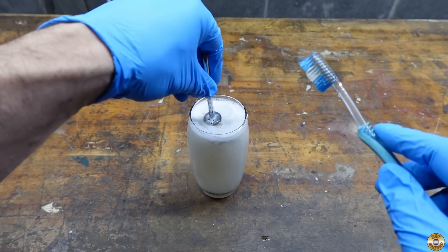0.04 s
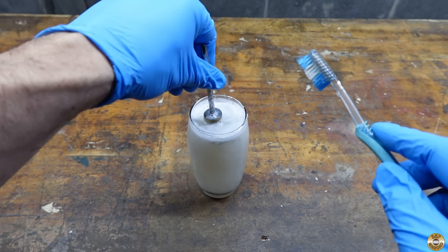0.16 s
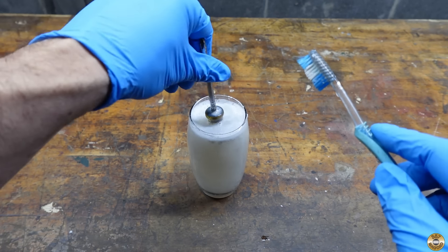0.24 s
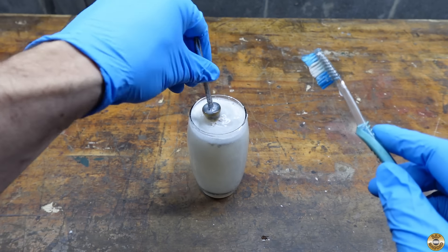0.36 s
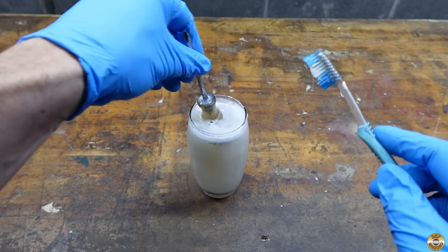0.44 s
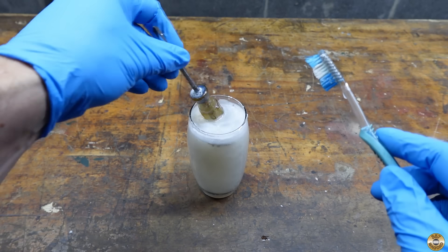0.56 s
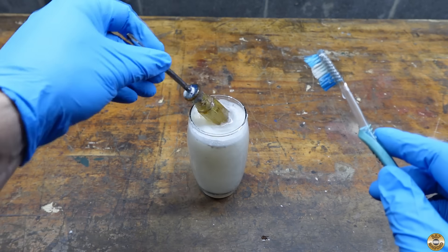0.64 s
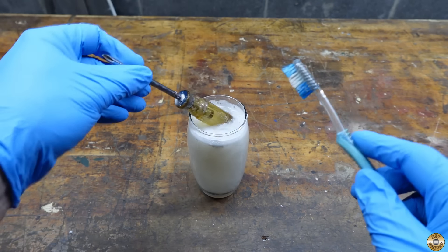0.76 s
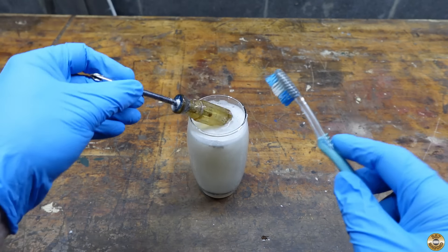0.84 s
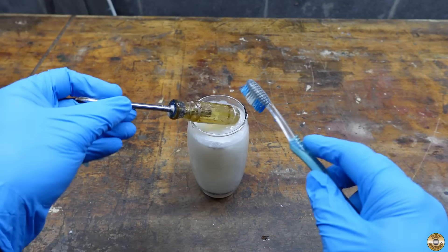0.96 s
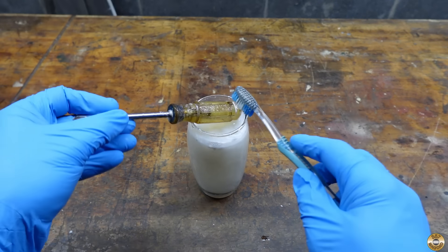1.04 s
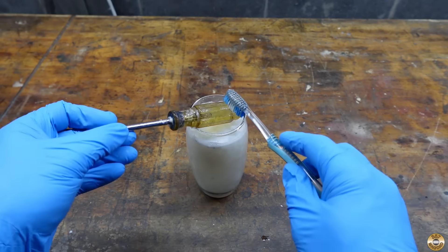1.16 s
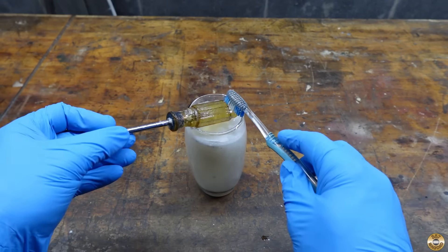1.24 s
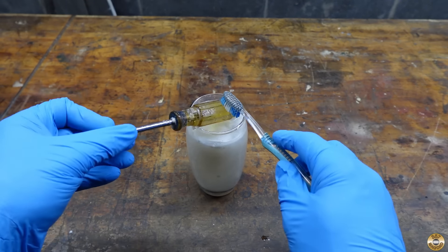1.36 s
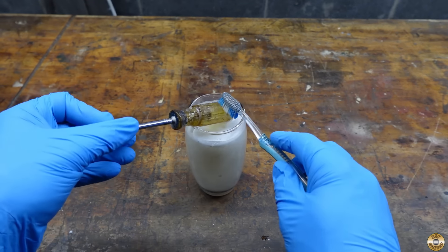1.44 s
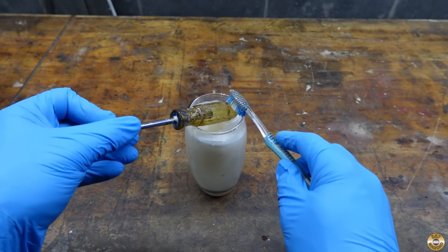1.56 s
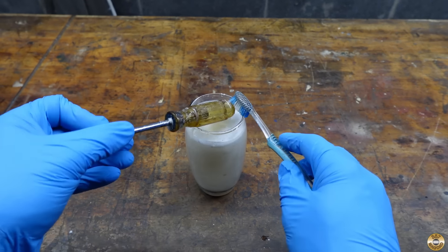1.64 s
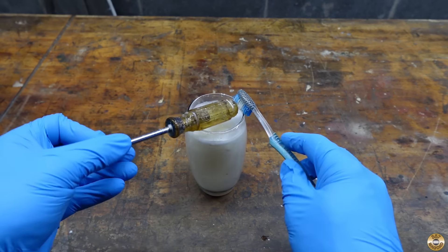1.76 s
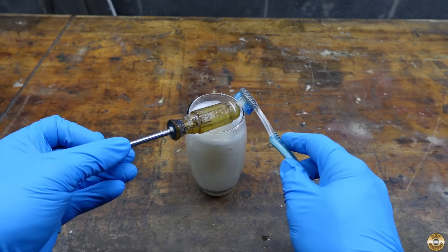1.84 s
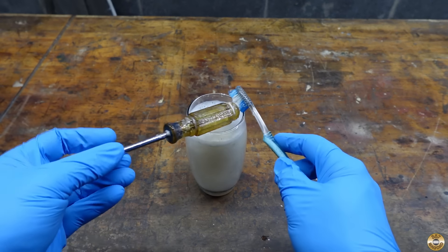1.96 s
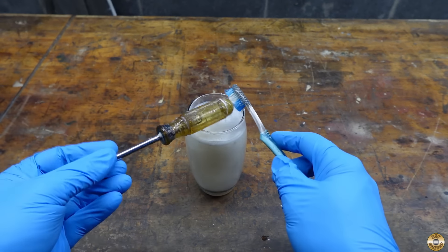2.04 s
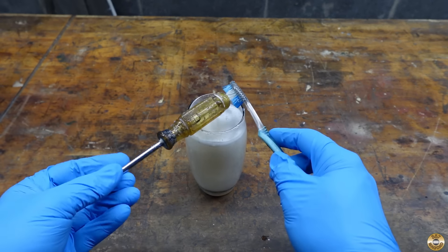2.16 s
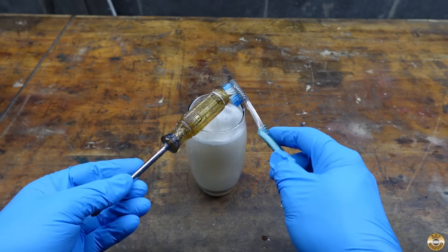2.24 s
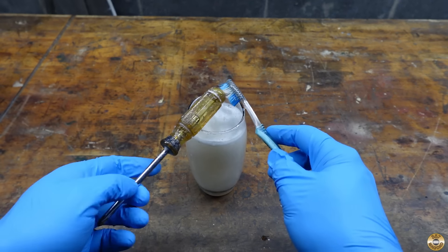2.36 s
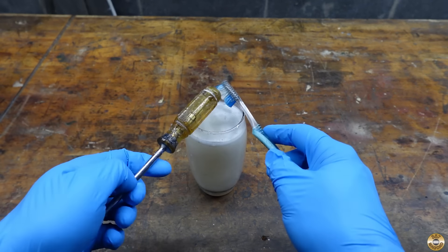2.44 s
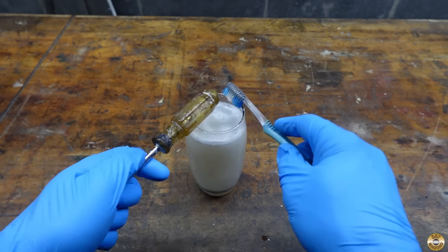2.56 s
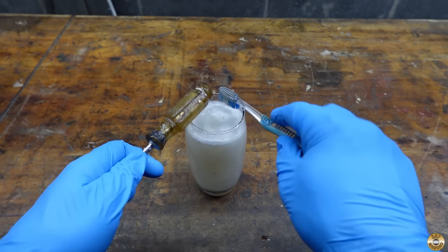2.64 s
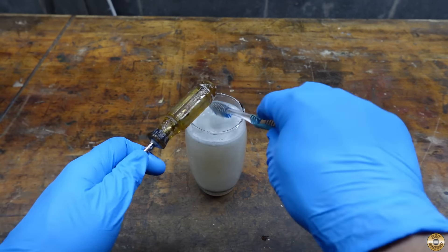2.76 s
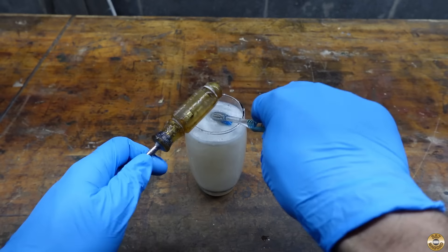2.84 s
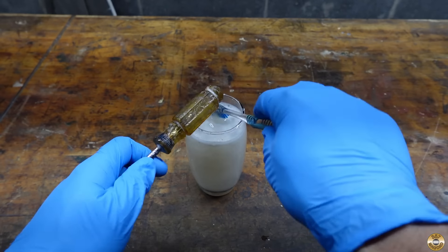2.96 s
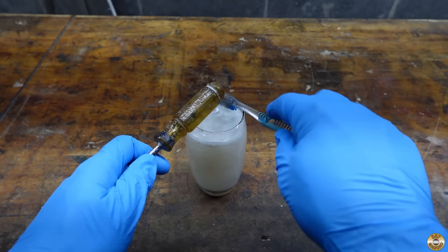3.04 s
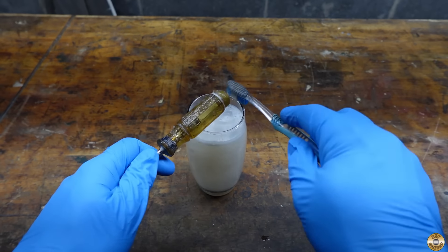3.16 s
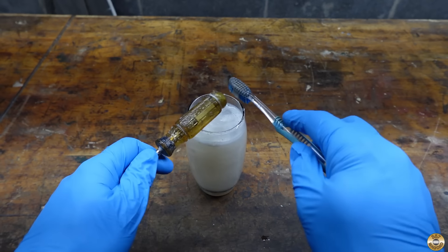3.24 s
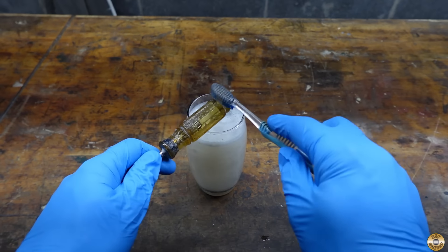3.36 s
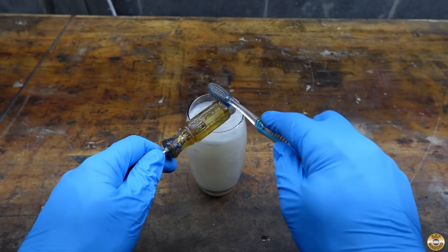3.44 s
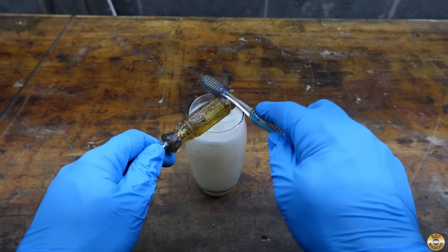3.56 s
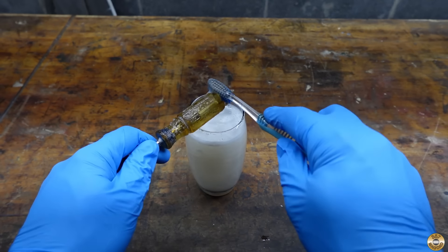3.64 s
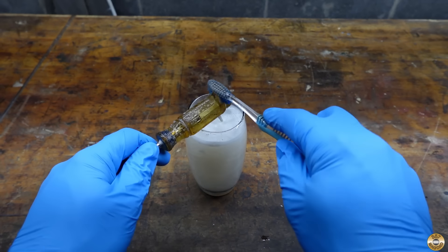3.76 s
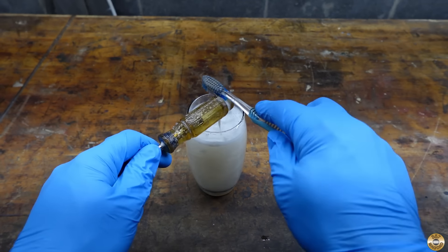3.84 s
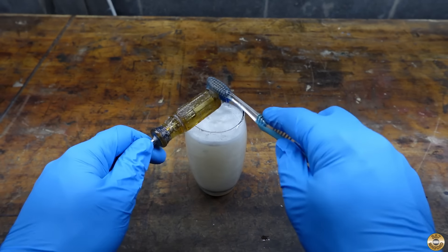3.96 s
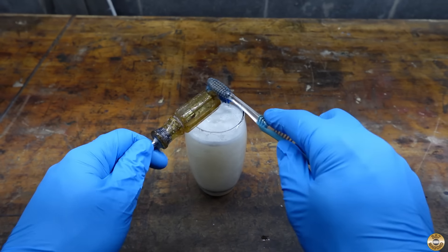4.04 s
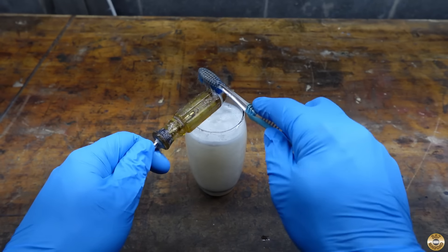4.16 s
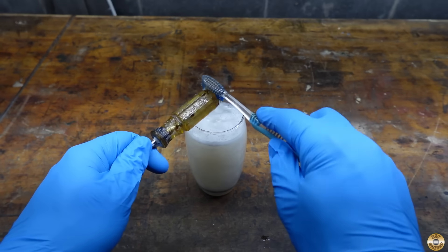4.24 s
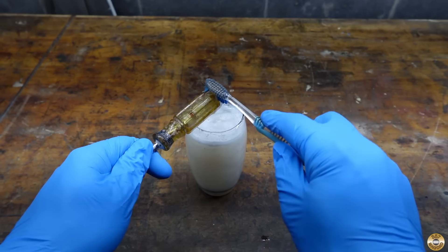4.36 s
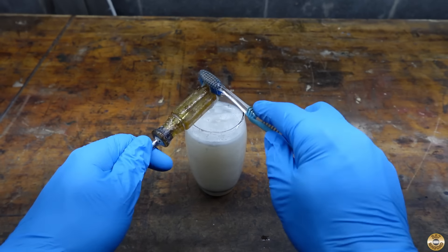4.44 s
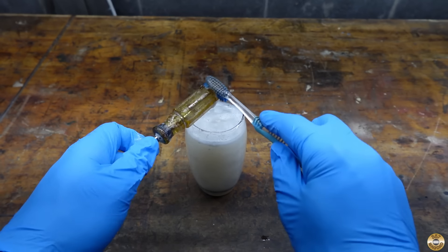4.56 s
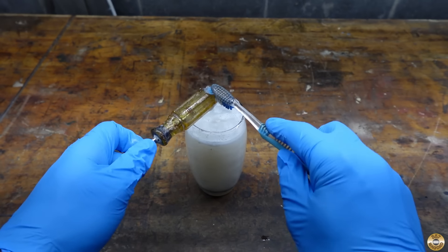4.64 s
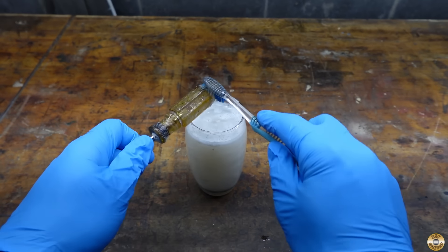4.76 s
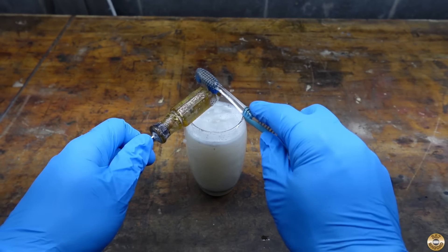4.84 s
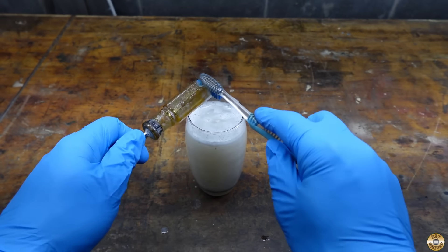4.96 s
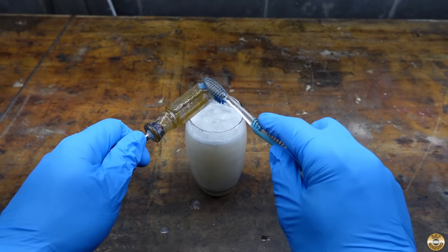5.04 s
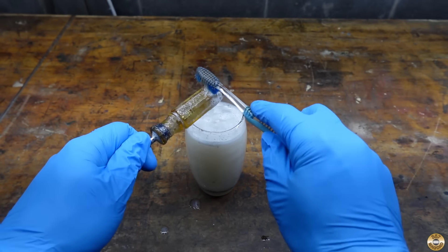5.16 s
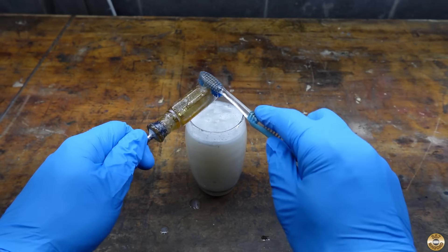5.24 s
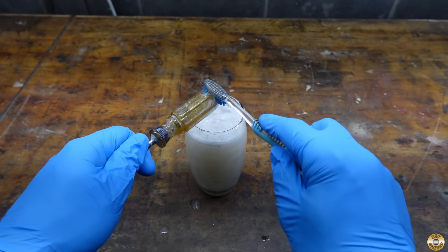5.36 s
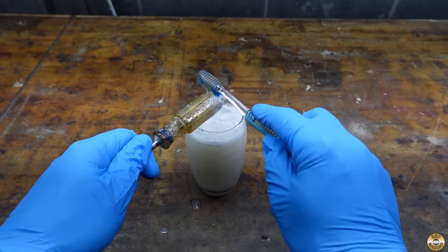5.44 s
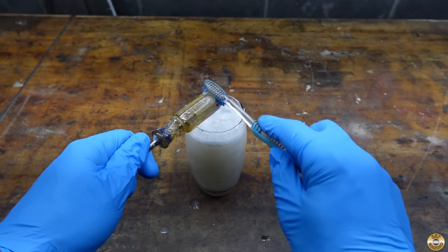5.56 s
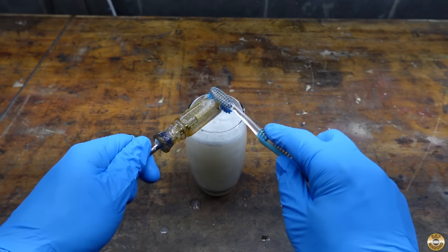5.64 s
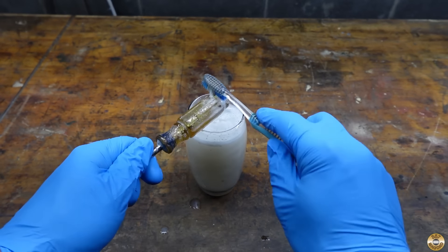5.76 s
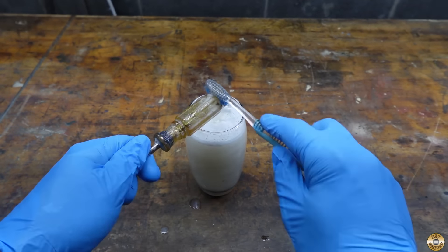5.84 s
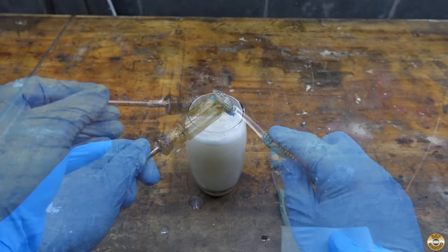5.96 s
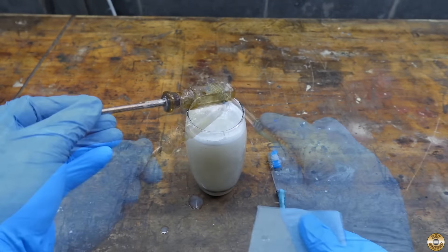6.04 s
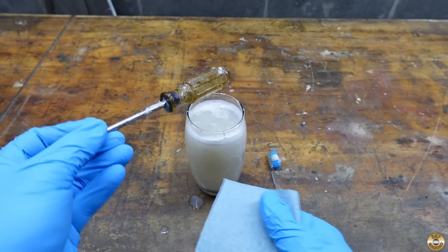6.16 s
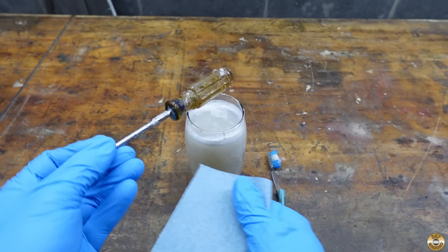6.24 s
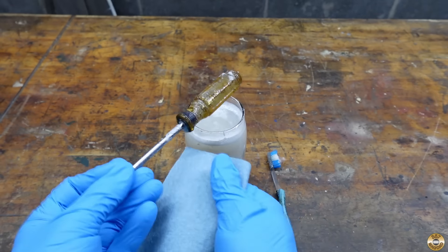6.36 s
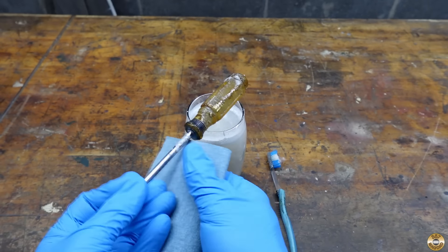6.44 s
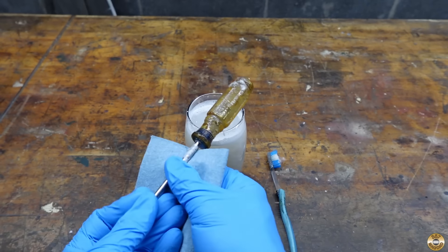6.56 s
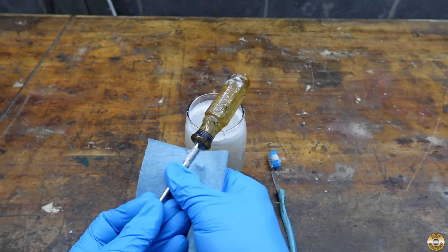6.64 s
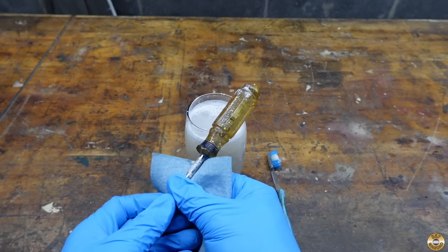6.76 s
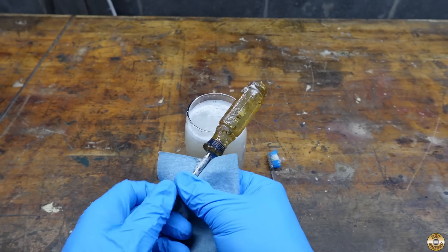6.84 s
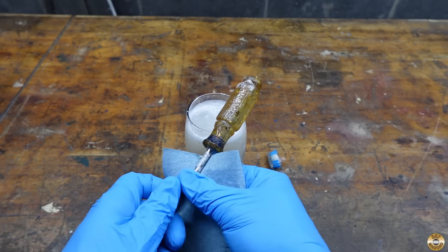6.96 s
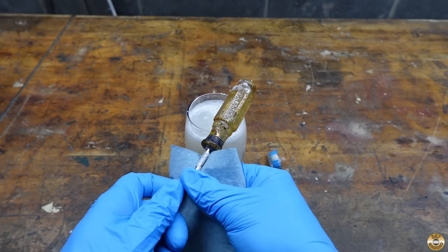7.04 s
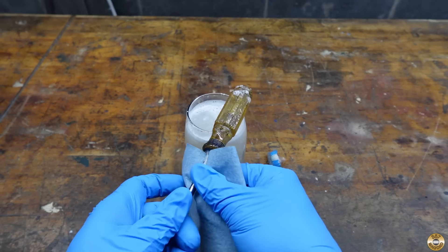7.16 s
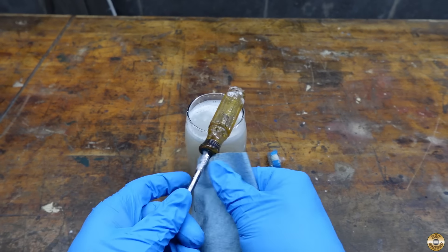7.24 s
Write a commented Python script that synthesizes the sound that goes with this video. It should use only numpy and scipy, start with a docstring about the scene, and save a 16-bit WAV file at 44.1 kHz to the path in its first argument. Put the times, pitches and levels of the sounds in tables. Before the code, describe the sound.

In a small quiet room, a screwdriver taps a full glass, bristles scratch briskly over its plastic handle, then a paper towel rubs the shaft.

```python
"""A small room with a wooden bench, heard by two close microphones; air noise and a low wavering hum throughout.
First a screwdriver is lifted from a glass of cleaning paste: a wet rub, clinks on the rim, bench thuds.
A wet toothbrush then scrubs the plastic handle, lightly, later in quick strokes, as bristles snap free.
A faint rumble comes and goes and a paper towel wipes the shaft; small pops and scrapes, a few early, most
during the wiping. Noise grains make the rubbing, decaying modes the knocks, short pitched bursts the snaps."""
import sys
import numpy as np
from scipy import signal
from scipy.fft import rfft, irfft
from scipy.io import wavfile
from scipy.ndimage import map_coordinates

SR = 44100
rng = np.random.default_rng(int(sys.argv[2]) if len(sys.argv) > 2 else 0)


def persist_wave(psi):
    """Save psi, clipped to +-1, as 16-bit WAV."""
    counts = np.round(np.clip(psi, -1, 1) * 32767).astype(np.int16)
    wavfile.write(sys.argv[1], SR, np.atleast_2d(counts).T)


N = 321489
TIME = np.arange(N) / SR
EDGE_HZ = 15900  # top of the recorder's band and of the brush fizz


def amp(db):
    """Decibels to gain."""
    return 10 ** (np.asarray(db) / 20)


def evened(x):
    """Scaled to an rms of 1."""
    return x / np.sqrt(np.mean(x ** 2) + 1e-20)


def read(points, hz):
    """A table of (Hz, value), joined on a log-frequency axis."""
    f, value = np.transpose(points)
    return np.interp(np.log(hz + 1), np.log(f + 1), value)


def add(mix, s, sound):
    """Lays a sound into the mix at time s."""
    part = mix[max(round(s * SR), 0):][:len(sound)]
    part += sound[:len(part)]


def colour(x, points, size=2048):
    """Minimum-phase filter with the given (Hz, dB) spectrum, so that clicks keep their sharp front."""
    hz = abs(np.fft.fftfreq(size, 1 / SR))
    log_gain = np.log(amp(np.maximum(read(points, hz), -100)))
    spectrum = np.exp(np.conj(signal.hilbert(log_gain)))
    taps = np.fft.ifft(spectrum).real
    return signal.oaconvolve(x, taps)[:len(x)]


def band(x, lo_hz, hi_hz):
    """Soft-edged band; bands that share an edge sum to the whole."""
    f = np.fft.rfftfreq(len(x), 1 / SR)

    def below(hz):
        """Gain of a soft low-pass."""
        return 1 / (1 + (f / hz) ** 12)

    return irfft(rfft(x) * (below(hi_hz) - below(lo_hz)), len(x))


def drift(per_s):
    """Smooth chance of rms 1 that changes so many times a second."""
    return evened(np.interp(TIME * per_s, np.arange(N), rng.standard_normal(N)))


def grains(per_s, spread_db):
    """A dense train of tiny slips, most small and a few large."""
    size = amp(spread_db * np.minimum(rng.exponential(1, N), 4))
    slips = rng.random(N) < per_s / SR
    return evened(size * rng.choice([-1, 1], N) * slips)


def ring(modes, t):
    """Decaying modes, each struck with a random sign."""
    out = 0
    for hz, db, t60 in modes:
        out = out + rng.choice([-1, 1]) * amp(db - 60 * t / t60) * np.sin(2 * np.pi * hz * t)
    return out


def slide(start, length, crest):
    """One movement: how far along it is (0-1), and its speed, which rises to 1 at the crest and falls back."""
    along = np.clip((TIME - start) / length, 0, 1)
    rise_and_fall = np.interp(along, [0, np.clip(crest, .05, .95), 1], [0, 1, 0])
    return along, np.sin(np.pi / 2 * rise_and_fall)


def mottle(x, db, width_hz, per_s, size=512):
    """The contact keeps changing, so patches of the spectrum swell and sink."""
    hz, t, z = signal.stft(x, SR, nperseg=size)
    at = np.meshgrid(hz / width_hz, t * per_s, indexing="ij")
    patches = evened(map_coordinates(rng.standard_normal(z.shape), at, order=1, mode="mirror"))
    return signal.istft(z * amp(db * patches), SR, nperseg=size)[1][:N]


def resonate(x, hz, width_hz):
    """A resonance of gain 1 that follows the curve hz."""
    turn = np.exp(2j * np.pi * np.cumsum(hz) / SR)
    r = np.exp(-np.pi * width_hz / SR)
    # shift the curve down to 0 Hz, smooth there, shift back
    return 2 * (turn * signal.lfilter([1 - r], [1, -r], x / turn)).real


# Room air at the microphones. Each row: frequency in Hz, relative density in dB per Hz.
AIR_COLOUR = [(50, -28), (85, -5.5), (135, -15), (233, -18.5), (254, -18.5), (536, -24.5), (1210, -27.5),
              (4590, -33.5), (4900, -32), (7430, -34.5), (16000, -37.5)]
# How wide the air spreads. Each row: frequency in Hz, side minus mid in dB.
AIR_SPREAD = [(70, -22), (130, -6.5), (290, -4), (3000, -5), (15000, -8.5)]
AIR_DB = -62  # rms of the mid


def air():
    """The steady wash of the room: noise, diffuse, but alike on both sides in the deepest bass."""
    mid, side = (evened(colour(rng.standard_normal(N), AIR_COLOUR, size=8192)) for _ in range(2))
    side = colour(side, AIR_SPREAD, size=8192)
    return amp(AIR_DB) * (mid + np.array([side, -side]))


# The hum in the small room, before its flutter. Each row: time in seconds, rms level in dB.
HUM_LEVEL = [(0.0, -62), (0.06, -54.5), (0.65, -60), (0.71, -75), (0.89, -57), (2.23, -63.5), (2.46, -49.5),
             (2.9, -59), (2.94, -67.5), (3.57, -51.5), (3.86, -71), (4.06, -60.5), (5.36, -59), (5.4, -75),
             (5.97, -51), (6.21, -74), (6.27, -56), (7.29, -69)]
HUM_HZ, HUM_FLUTTER_DB = 66.5, 2.34  # mean pitch; rms of the quick wobble in level


def hum(waver_hz=2.42):
    """A low sine that swells, flutters and wavers in pitch."""
    turns = np.cumsum(HUM_HZ + waver_hz * drift(10)) / SR
    db = np.interp(TIME, *np.transpose(HUM_LEVEL)) + HUM_FLUTTER_DB * drift(9)
    return amp(db) * np.sqrt(2) * np.sin(2 * np.pi * turns)


# Wet rubs on the handle, close by: the first as it leaves the paste, the rest by the brush.
# Each row: start in seconds, length in seconds, swish at the crest in dB before the trim, fastest point
# as a share of the length, low rasp at mid-stroke re swish in dB, fizz at the stroke's end re swish in dB.
WET_STROKES = [(0.12, 0.097, -54, 0.55, -13, -7), (1.602, 0.035, -60.5, 0.83, -25, 1),
               (1.673, 0.064, -67, 0.94, -20, 6), (1.751, 0.114, -74, 0.8, -20, 10),
               (1.886, 0.083, -60.5, 0.58, -5.5, 4), (2.083, 0.074, -61.5, 0.51, -16, 9),
               (2.263, 0.11, -53, 0.65, -12, 3), (2.266, 0.33, -56, 0.48, -7, 3),
               (2.517, 0.038, -52, 0.57, 2, -3), (2.522, 0.16, -54, 0.41, -3, -3),
               (3.116, 0.1, -69, 0.21, 2, 1), (3.428, 0.16, -49, 0.58, -5, 5.5),
               (3.586, 0.15, -40.5, 0.81, -9, 0), (3.731, 0.19, -45, 0.72, -3, 5.5),
               (3.903, 0.11, -37.5, 0.73, -13, -11), (3.993, 0.094, -47, 0.16, 5.5, 4),
               (4.098, 0.14, -47.5, 0.22, 3, 5), (4.224, 0.2, -45, 0.31, 1, 4),
               (4.414, 0.065, -53, 0.3, -1, 10.5), (4.487, 0.083, -55, 0.24, 1, 3),
               (4.524, 0.21, -58.0, 0.34, 5, 4), (4.629, 0.11, -47.5, 0.48, -3.5, 10),
               (4.762, 0.16, -49, 0.56, -4.5, 7), (4.937, 0.15, -45.5, 0.54, -7.5, 4.5),
               (5.051, 0.18, -50.5, 0.63, -6.5, 6.5), (5.186, 0.179, -45.5, 0.91, -8, 1),
               (5.389, 0.14, -42.5, 0.54, -10.5, -0.5), (5.52, 0.15, -40.5, 0.75, -8, 2.5),
               (5.689, 0.16, -46, 0.52, -8.5, 0.5), (5.838, 0.1, -45.0, 0.64, -8.5, -1),
               (5.888, 0.21, -50.5, 0.089, -0.5, 3), (6.008, 0.11, -51.5, 0.37, -4, 4)]
# Between strokes the bristles stay on the handle and keep creeping.
# Each row: start in seconds, length in seconds, swish in dB before the trim.
BRUSH_CONTACTS = [(1.61, 1.295, -72), (3.419, 2.72, -65.5)]
# Bristles on plastic. Each row: frequency in Hz, relative density in dB per Hz.
BRUSH_COLOUR = [(710, -35), (1200, -19), (2060, -15), (2250, -9), (2790, -3), (3620, -7), (4500, 1.5),
                (4960, -2), (5350, 0.5), (7020, -3), (7740, -0.5), (9820, 0), (11800, -3), (15200, 5),
                (16000, -7)]
STROKE_SHARPNESS = 1.87  # loudness grows as this power of the brush's speed
BEND_RASP_DB, BEND_FIZZ_DB = 7, 9  # gained from start to end of a stroke, as the bristles bend over
TOUCH_S, LIFT_S = 0.0045, 0.08  # the bristles land quickly and leave slowly
CREEP_RASP_DB, CREEP_FIZZ_DB = -2, 2  # re the creeping swish


def scrub(trim_db=-0.53, clump_db=2.0, low_edge_hz=5900, high_edge_hz=11000):
    """Bristles slip in clumps over the handle; bent ones rasp low, upright tips swish and fizz."""
    creep = np.zeros(N)
    for s, length, db in BRUSH_CONTACTS:
        touch = np.minimum((TIME - s) / TOUCH_S, (s + length - TIME) / LIFT_S)
        creep += amp(db) * np.clip(touch, 0, 1)
    rasp, swish, fizz = creep * amp(CREEP_RASP_DB), creep, creep * amp(CREEP_FIZZ_DB)
    for s, length, db, crest, low, high in WET_STROKES:
        along, speed = slide(s, length, crest)
        level = amp(db) * speed ** STROKE_SHARPNESS
        rasp = np.hypot(rasp, level * amp(low + BEND_RASP_DB * (along - .5)))
        swish = np.hypot(swish, level)
        fizz = np.hypot(fizz, level * amp(high + BEND_FIZZ_DB * (along - 1.0)))
    clumps = amp(clump_db * drift(280))
    slips = colour(grains(per_s=13000, spread_db=4.5) * clumps, BRUSH_COLOUR)
    slips = mottle(slips, db=2.3, width_hz=360, per_s=65)
    low_part = rasp * evened(band(slips, 1, low_edge_hz))
    middle_part = swish * evened(band(slips, low_edge_hz, high_edge_hz))
    top_part = fizz * evened(band(slips, high_edge_hz, EDGE_HZ))
    return amp(trim_db) * (low_part + middle_part + top_part)


# Single bristles and wet films snapping, close by.
# Each row: start in seconds, nominal peak in dB before the trim, pitch in Hz.
BRISTLE_SNAPS = [(0.307, -41.5, 8500), (0.8026, -44, 10600), (0.9093, -41.5, 5600), (1.7928, -30, 14100),
                 (1.8004, -27, 15000), (2.2298, -28.5, 14100), (2.3855, -26, 13000), (2.3924, -25, 13500),
                 (2.4588, -19.5, 13100), (2.4723, -23, 8700), (3.4221, -33, 8900), (3.4274, -27, 14700),
                 (3.5613, -22.5, 11000), (3.8268, -12.5, 13800), (3.8344, -19, 13500), (3.9534, -20, 9560),
                 (3.9823, -14, 6860), (4.1105, -37, 5200), (4.1465, -21.5, 5240), (4.1962, -13.5, 12000),
                 (4.1976, -19, 7100), (4.2622, -21, 9700), (4.2737, -16.5, 8850), (4.4228, -24, 14000),
                 (4.8125, -22.5, 10900), (4.9771, -28, 13000), (5.1086, -23, 9840), (5.1213, -20.5, 9600),
                 (5.1442, -21, 9600), (5.4175, -15.5, 10300), (5.4244, -23, 9000), (5.459, -22.5, 9600),
                 (5.466, -22.5, 5430), (5.5862, -21, 13000), (5.7474, -24, 8850), (5.8905, -31, 9500),
                 (6.0534, -17, 15200)]
# Small dull pops and scrapes, close by.
# Each row: start in seconds, nominal peak in dB before the trim, pitch in Hz.
DULL_POPS = [(1.044, -45, 3060), (2.3213, -38.5, 2860), (6.058, -37.5, 3200), (6.3713, -43, 2270),
             (6.413, -33.5, 3620), (6.422, -47, 3040), (6.9565, -29, 3330)]


def ticks(rows, trim_db, cycles, tail_db, tail_t60):
    """A short burst: a few cycles at its own pitch, trailed by a tiny spray of noise."""
    out, t = np.zeros(N), np.arange(1024) / SR
    for s, db, hz in rows:
        age = t * hz / cycles
        tick = age * np.exp(1 - age) * np.sin(2 * np.pi * hz * t)
        around_pitch = [(hz / 4, -20), (hz / 2, -3), (hz, 0), (hz * 2, -6)]
        spray = evened(colour(rng.standard_normal(len(t)), around_pitch))
        add(out, s, amp(db + trim_db) * (tick + amp(tail_db - 60 * t / tail_t60) * spray))
    return out


# The screwdriver clinking on the glass rim.
# Each row: start in seconds, peak in dB before the trim, centre in Hz that sets the brightness.
RIM_CLINKS = [(0.8693, -39.5, 1800), (0.9402, -38.5, 1800), (1.1647, -42.5, 1050)]
# First crack of steel on the rim. Each row: frequency in Hz, relative density in dB per Hz.
STEEL_CRACK = [(500, -2), (1500, 8.5), (2300, -1), (4200, -2), (5200, -9), (15000, -27)]
# The screwdriver, damped by the hand. Each row: mode in Hz, relative level in dB, 60 dB decay in seconds.
TOOL_MODES = [(1807, -6.5, 0.1), (2250, 2, 0.03), (3350, -6, 0.036), (3970, 0.5, 0.026)]
# Plastic tapping on the glass.
# Each row: start in seconds, peak in dB before the trim, centre in Hz that sets the brightness.
PLASTIC_TAPS = [(1.941, -36, 1590), (2.1193, -46, 1130), (2.8926, -26.5, 1800), (3.375, -42.5, 1060)]
# First crack of plastic on glass. Each row: frequency in Hz, relative density in dB per Hz.
PLASTIC_CRACK = [(600, -42), (1100, -24), (1700, 8), (2300, -13), (3600, -13.5), (4400, -5.5), (5200, -9),
                 (6300, -16), (15000, -31.5)]
# The full glass, damped by the paste. Each row: mode in Hz, relative level in dB, 60 dB decay in seconds.
GLASS_MODES = [(1322, 22.5, 0.018), (1460, -19, 0.063), (1726, -6, 0.13), (1780, -12, 0.23),
               (3930, 3, 0.06), (4400, -5, 0.054)]


def clinks(rows, crack_colour, modes, trim_db, ring_db, chatter_db, lean_db, middle_hz):
    """One sharp push with decaying chatter, over a choked ring; a softer contact loses its top."""
    out, t = np.zeros(N), np.arange(SR // 5) / SR
    for s, db, hz in rows:
        chatter = amp(chatter_db - 60 * t / 0.088) * rng.standard_normal(len(t))
        push = (t == 0) + chatter
        crack = colour(push, crack_colour)
        clink = crack / abs(crack).max() + amp(ring_db) * ring(modes, t)
        clink = colour(clink, [(1400, 0), (4000, lean_db * np.log2(hz / middle_hz))])
        add(out, s, amp(db + trim_db) * clink / abs(clink).max())
    return out


# The glass is bumped and shakes the bench under it. Each row: start in seconds, peak in dB before the trim,
# centre of the thud in Hz that sets its brightness, share of the deep boom in dB before deep_db.
BENCH_KNOCKS = [(0.873, -36, 470, -15), (0.94, -31, 480, -9.5), (1.134, -40.5, 477, -16),
                (1.153, -27.5, 414, -4.5), (1.163, -34, 460, -10), (1.388, -38, 270, -6),
                (1.596, -36.5, 262, -13), (1.615, -43, 333, -4.5), (1.669, -41.5, 366, -6.5),
                (1.883, -39, 199, -5), (1.942, -31.5, 376, -14.5), (2.118, -25.5, 417, -11),
                (2.423, -38, 386, -20.5), (2.537, -38.5, 330, -9.5), (2.891, -44, 336, -9.5),
                (3.373, -30, 510, -14), (3.4, -32.5, 447, -15)]
# The wooden bench top. Each row: mode in Hz, relative level in dB, 60 dB decay in seconds.
BENCH_MODES = [(201.5, 0.5, 0.15), (278.1, -2.5, 0.41), (327.4, -5.5, 0.46), (359, -5, 0.38),
               (457.7, 2, 0.2), (503, -21, 0.08), (603, -12, .16)]
# The bench's dense ring. Each row: frequency in Hz, relative density in dB per Hz.
BENCH_BOOM = [(65, -59), (110, 1.5), (227, 3), (425, 7), (499, 6), (585, -6.5), (796, -5.5), (1400, -25.5),
              (1820, -18), (3080, -120)]


def knocks(trim_db=-1, dense_db=-3, lean_db=18, middle_hz=430, deep_db=11, rise_s=0.0023):
    """The bench top rings; a bump with a higher centre starts faster and leans toward its higher modes."""
    out, t = np.zeros(N), np.arange(SR // 2) / SR
    low_t60, high_t60 = .28, .18  # seconds
    for s, db, hz, deep in BENCH_KNOCKS:
        noise = colour(rng.standard_normal(len(t)), BENCH_BOOM)
        low = band(noise, 0.91, 432) * amp(-60 * t / low_t60)
        high = band(noise, 490, SR) * amp(-60 * t / high_t60)
        thud = evened(ring(BENCH_MODES, t)) + amp(dense_db) * evened(low + high)
        lean = lean_db * np.log2(hz / middle_hz)
        thud = colour(thud, [(220, deep + deep_db), (340, 0.021), (650, lean)])
        thud = thud * (1 - np.exp(-t / (rise_s * (middle_hz / hz) ** 3)))
        add(out, s, amp(db + trim_db) * thud / abs(thud).max())
    return out


# A faint low rumble swells and fades, once before the wiping and once beneath it. # Each row: start in seconds,
# length in seconds, level at the crest in dB.
LOW_RUMBLES = [(5.07, 0.7, -66.5), (6.3, 1.15, -69)]


def rumble(low_hz=160, high_hz=370):
    """Dull band of noise that swells and fades."""
    swell = sum(amp(db) * slide(s, length, 0.46)[1] ** 2 for s, length, db in LOW_RUMBLES)
    return swell * evened(band(rng.standard_normal(N), low_hz, high_hz))


# Slides of the paper towel along the shaft, close by. Each row: start in seconds, length in seconds,
# level at the crest in dB before the trim, fastest point as a share of the length,
# dull rub re level in dB, fizz re level in dB, ring of the fold in Hz.
TOWEL_WIPES = [(5.985, 0.22, -57.5, 0.69, -7, -18, 2010), (6.181, 0.14, -56, 0.23, -13, -20, 2000),
               (6.337, 0.095, -52, 0.93, -14, 1.5, 2840), (6.433, 0.2, -48.5, 0.82, -14.5, -6.5, 1580),
               (6.675, 0.16, -49, 0.57, -4.5, -6, 2800), (6.744, 0.18, -49.5, 0.59, -9.5, 0.5, 1650),
               (6.893, 0.11, -54, 0.92, -13, 1.5, 2420), (6.963, 0.26, -48, 0.8, -12, -3.5, 1570),
               (7.176, 0.22, -41, 0.33, -15, -6, 1630)]
# Paper fibres on the shaft. Each row: frequency in Hz, relative density in dB per Hz.
PAPER_COLOUR = [(210, -34), (350, -24.5), (572, -14), (837, -8), (1280, -8.5), (1660, -2.5), (2100, -4),
                (2420, -2), (3170, 1), (4720, -4), (6790, -11), (12000, -19.5), (15500, -18)]
WIPE_SHARPNESS = 1.25  # loudness grows as this power of the towel's speed
GRIP_S, GRIP_DB = 5.995, -61.5  # from then on the held towel rustles, at this level before the trim
GRIP_DULL_DB, GRIP_FIZZ_DB = -4.5, -2  # re the rustle's level
FOLD_HZ = 2040  # ring of the fold around the shaft while the towel is only held


def towel(trim_db=-0.02, fold_db=-3, clump_db=1.0, low_edge_hz=1250, high_edge_hz=5600):
    """Paper fibres catch and let go; the fold around the shaft rings at a pitch that moves with the grip."""
    level = amp(GRIP_DB) * (TIME > GRIP_S)
    dull, fizz = level * amp(GRIP_DULL_DB), level * amp(GRIP_FIZZ_DB)
    fold_hz = np.full(N, FOLD_HZ)
    for s, length, db, crest, low, high, hz in TOWEL_WIPES:
        speed = slide(s, length, crest)[1]
        wipe = amp(db) * speed ** WIPE_SHARPNESS
        level = np.hypot(level, wipe)
        dull = np.hypot(dull, wipe * amp(low))
        fizz = np.hypot(fizz, wipe * amp(high))
        fold_hz = fold_hz + (hz - fold_hz) * np.sqrt(speed)
    clumps = amp(clump_db * drift(150))
    fibres = colour(grains(per_s=12000, spread_db=2.5) * clumps, PAPER_COLOUR)
    fibres = mottle(fibres, db=2.1, width_hz=280, per_s=55)
    body = band(fibres, low_edge_hz, high_edge_hz)
    fold = resonate(body, fold_hz, width_hz=350)
    body = evened(evened(body) + amp(fold_db) * evened(fold))
    rub = evened(band(fibres, 1, low_edge_hz))
    top = evened(band(fibres, high_edge_hz, SR))
    return amp(trim_db) * (level * body + dull * rub + fizz * top)


# Decay of the small room. Each row: frequency in Hz, 60 dB decay in seconds.
ROOM_DECAY = [(150, 0.69), (400, 0.41), (1500, 0.46), (5000, 0.44), (15000, 0.14)]


def room(x, wet_db, side_db):
    """Direct sound plus a short tail of decaying noise, heard by two close microphones."""
    hz, t, z = signal.stft(rng.standard_normal((2, SR // 2)), SR, nperseg=256)
    decay = amp(-60 * t / read(ROOM_DECAY, hz)[:, None])
    tail = signal.istft(z * decay, SR, nperseg=256)[1]
    tail[:, :SR // 400] = 0  # a gap of 2.5 ms before the first reflections
    tail = tail / np.linalg.norm(tail[0])
    mid, side = signal.fftconvolve(x[None], tail, axes=1)[:, :N]
    return x + amp(wet_db) * mid + amp(side_db) * np.array([side, -side])


def scene():
    """All sources on the bench, in the room."""
    snaps = ticks(BRISTLE_SNAPS, trim_db=-5.0, cycles=1.0, tail_db=-12.0, tail_t60=0.011)
    steel = clinks(RIM_CLINKS, STEEL_CRACK, TOOL_MODES, trim_db=0.5, ring_db=-8.5, chatter_db=-17,
                   lean_db=9, middle_hz=1800)
    pops = ticks(DULL_POPS, trim_db=1, cycles=.6, tail_db=-16, tail_t60=.015)
    plastic = clinks(PLASTIC_TAPS, PLASTIC_CRACK, GLASS_MODES, trim_db=1.0, ring_db=-26, chatter_db=-25,
                     lean_db=30, middle_hz=1640)
    brushing = room(scrub() + snaps, wet_db=-13.0, side_db=-22.0)
    clinking = room(steel + plastic, wet_db=-11.5, side_db=-17)
    knocking = room(knocks(), wet_db=-9.5, side_db=-20.0)
    wiping = room(towel() + pops, wet_db=-16.5, side_db=-19)
    return air() + hum() + brushing + clinking + knocking + rumble() + wiping


def record(dry):
    """The recorder's band limit: a steep low-pass."""
    low_pass = signal.firwin(511, EDGE_HZ, window=("kaiser", 9), fs=SR)
    return signal.oaconvolve(dry, low_pass[None], "same")


dry = scene()
out = record(dry)
persist_wave(out)
```